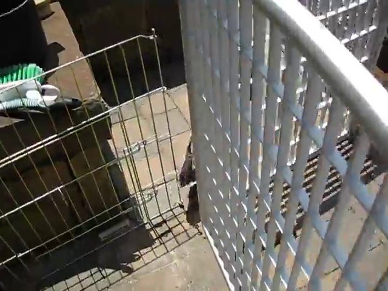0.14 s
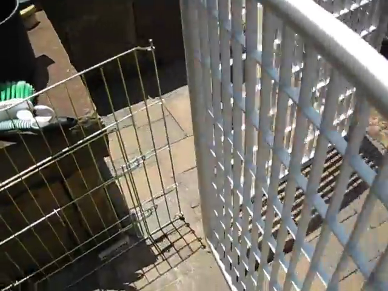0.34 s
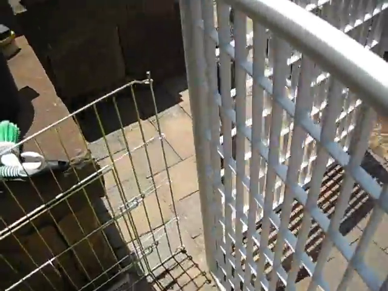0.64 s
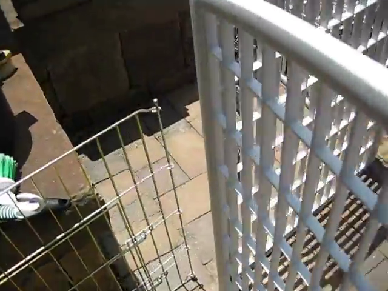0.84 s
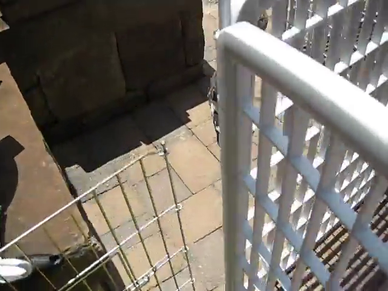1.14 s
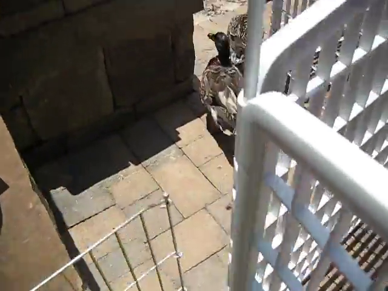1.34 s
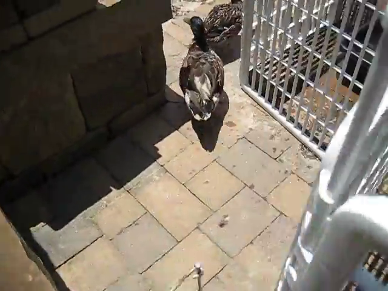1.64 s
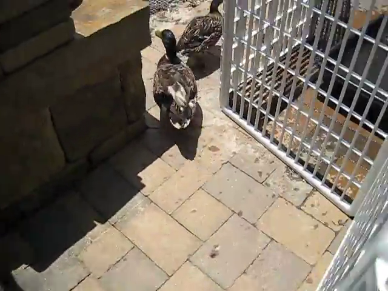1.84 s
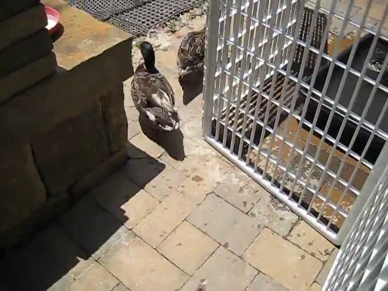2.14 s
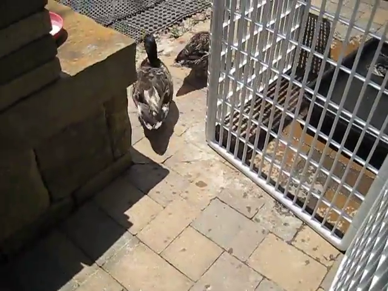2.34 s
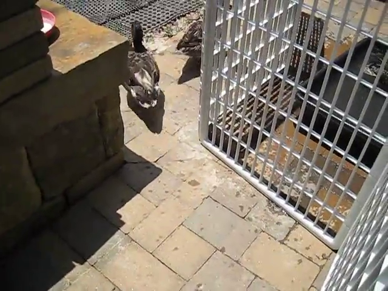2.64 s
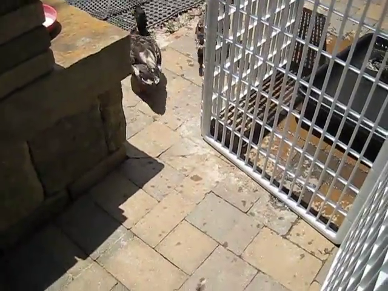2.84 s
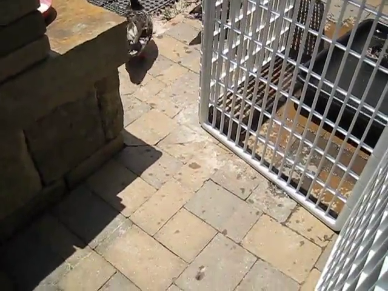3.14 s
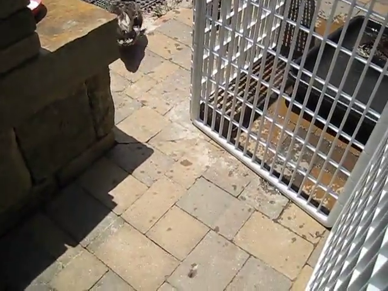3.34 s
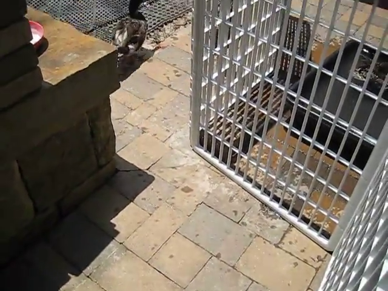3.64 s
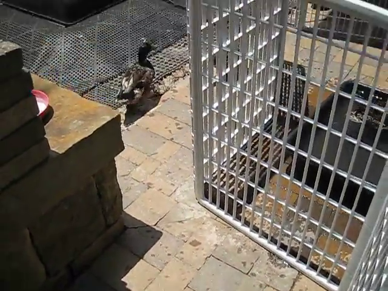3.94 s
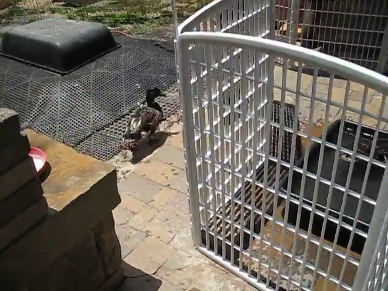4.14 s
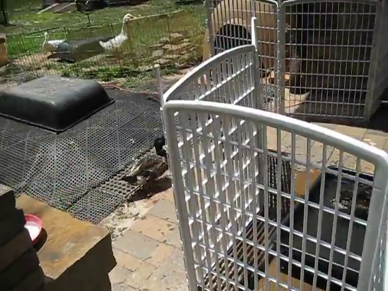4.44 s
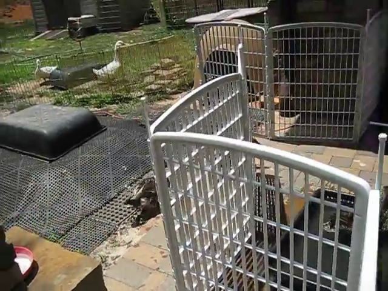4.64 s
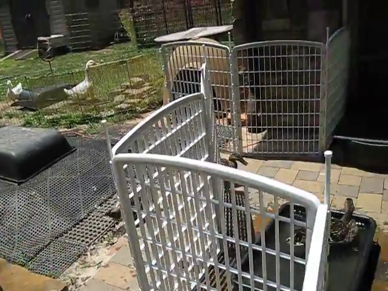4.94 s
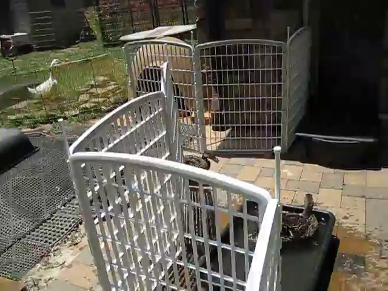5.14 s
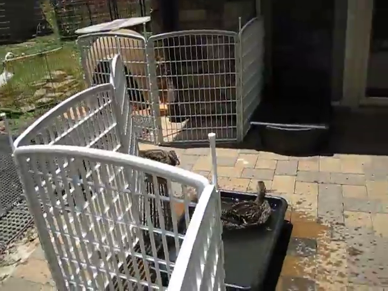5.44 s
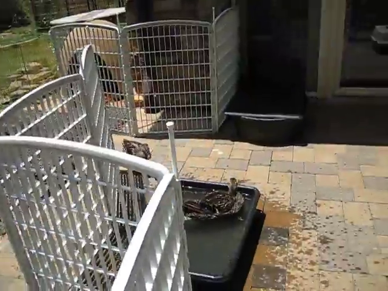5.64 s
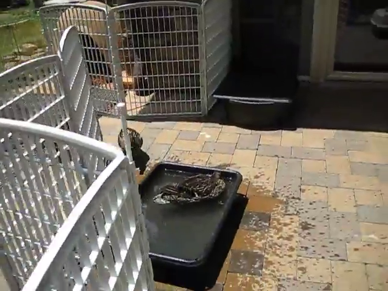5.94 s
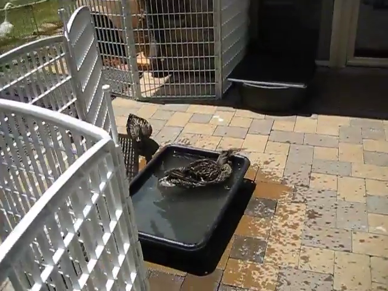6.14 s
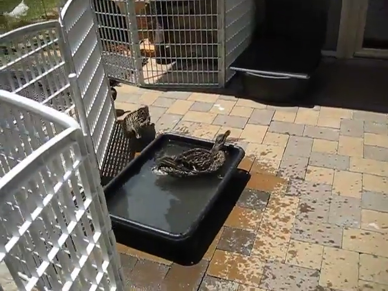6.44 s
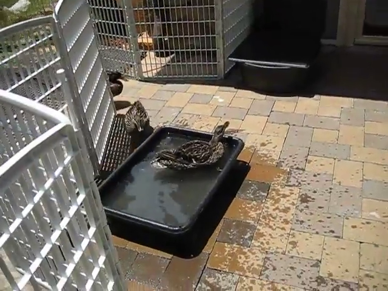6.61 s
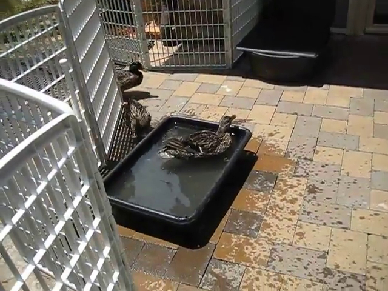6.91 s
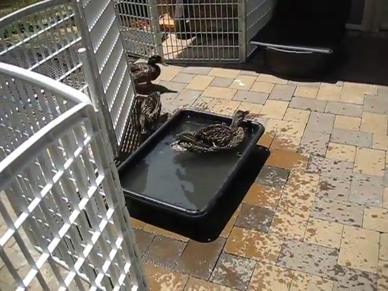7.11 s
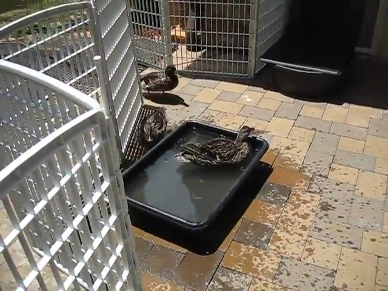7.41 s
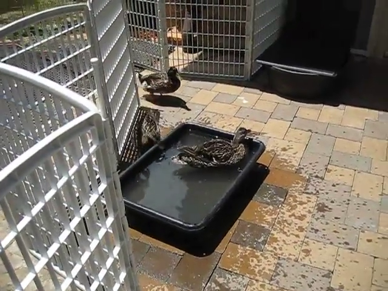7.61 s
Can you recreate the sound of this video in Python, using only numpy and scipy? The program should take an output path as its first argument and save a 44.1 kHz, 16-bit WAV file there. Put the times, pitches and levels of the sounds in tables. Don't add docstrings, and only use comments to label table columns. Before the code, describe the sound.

Ducks chatter on a sunny paved patio: first a near drake's grainy, buzzing rasps, then hens' louder, faster quacks overlapping. Thin wires shiver and ring as the gate is shaken, with small ticks and one hard clip rattle after the busiest calling. The flock quiets to closed-bill mutters and faint hisses before a few last quacks and a foot drag. Short wall echoes, soft water, airy hiss and low traffic surround them.

```python
import sys
import numpy as np
from scipy import signal
from scipy.fft import rfft, irfft, next_fast_len
from scipy.io import wavfile
from scipy.ndimage import uniform_filter1d, map_coordinates

SR = 44100
rng = np.random.default_rng(int(sys.argv[2]) if len(sys.argv) > 2 else 0)


def persist_wave(psi):
    counts = np.round(np.clip(psi, -1, 1) * 32767).astype(np.int16)
    wavfile.write(sys.argv[1], SR, np.atleast_2d(counts).T)


def makeup_ratio(level_db):
    decades = np.asarray(level_db, float) / 20
    return 10 ** decades


N = 342657


def unit(x):
    return x / np.sqrt(np.mean(x ** 2) + 1e-20)


def along(points, hz):
    f, v = np.transpose(points)
    return np.interp(np.log(hz + 1), np.log(f + 1), v)


def filtered(x, response):
    m = next_fast_len(len(x) + 8192)
    return irfft(rfft(x, m) * response(np.fft.rfftfreq(m, 1 / SR)), m)[:len(x)]


def add_at(out, s, sound):
    out[round(s * SR):][:len(sound)] += sound


def rush(spectrum, patchy_db):
    z = signal.stft(rng.standard_normal(N), nperseg=512)[2]
    patches = uniform_filter1d(rng.standard_normal(z.shape), size=6, axis=0)
    patches = uniform_filter1d(patches, size=12, axis=1)
    noise = signal.istft(z * makeup_ratio(patchy_db * unit(patches)), nperseg=512)[1][:N]
    points = [(8, -120)] + list(spectrum) + [(21000, -120)]
    return unit(filtered(noise, lambda hz: makeup_ratio(along(points, hz))))


def resonances(modes, f, order=1):
    total = 0
    for k, (c, w, db) in enumerate(modes):
        ring = 1j * f * w / (c * c - f * f + 1j * f * w)
        total = total + (-1) ** k * makeup_ratio(db) * ring ** order
    return total


def strokes(rows, db_per_s, fade_s):
    t = np.arange(N) / SR
    gain = np.zeros(N)
    for s, length, db in rows:
        slope_db = db_per_s * np.clip(t - s - length / 2, -length, length)
        fade = np.clip(np.minimum(t - s, s + length - t) / fade_s, 0, 1)
        gain += makeup_ratio(db + slope_db) * fade
    return gain


def duck(calls, pipe, jitter, scatter_db, puff, puff_s, arch, tint_db, rise, stretch, follows=(1, 2)):
    out, t = np.zeros(N + SR), np.arange(8192) / SR
    f = np.fft.rfftfreq(len(t), 1 / SR)
    puff_shape = rfft((t / puff_s * np.exp(1 - t / puff_s)) ** 2)
    for s, db, length, *colour_db, pulse_hz in calls:
        timing, loudness, pose, angle, detune = rng.standard_normal((5, 40))
        air = rng.standard_normal(len(t))
        times = np.cumsum((1 + jitter * timing) / pulse_hz) - .7 / pulse_hz
        places = np.clip(times * SR, 0, len(t) - 1).astype(int)

        def effort(when):
            return np.sin(np.pi * np.clip(when / (stretch * length), 0, 1) ** rise) ** 0.811

        def train(size):
            return np.bincount(places, size, len(t))

        size = effort(times) * makeup_ratio(scatter_db * loudness)
        breath = puff * irfft(rfft(train(size)) * puff_shape) * air / np.sqrt(puff_s * SR)
        neck = 1 + .01 * pose[0]
        turn = iter(1.5 * angle)
        shift = iter(1 + .01 * detune)
        parts = []
        for group in pipe:
            rung = 0
            for k, (hz, width, level) in enumerate(group):
                slaps = train(size * makeup_ratio(tint_db * rng.standard_normal(40)))
                mode = (hz * next(shift), width, level + next(turn))
                rung = rung + (-1) ** k * rfft(slaps + breath) * resonances([mode], f * neck, order=2)
            parts.append(unit(irfft(rung)))
        opening = .4 + .7 * effort(t - .006)
        opening = opening * makeup_ratio(np.interp(t, .011 * np.arange(39), pose[1:]))
        voice = parts[0]
        for g, part, k in zip(colour_db, parts[1:], follows):
            voice = voice + makeup_ratio(g) * part * opening ** k
        waver = .015 * np.interp(t, .014 * np.arange(40), angle[::-1])
        pace = 1 + arch * (effort(t) - .7) + waver
        voice = map_coordinates(voice, [np.cumsum(pace)])
        add_at(out, s, makeup_ratio(db) * np.sqrt(length * SR / len(t)) * voice)
    return out[:N]


# (time [s], level [dB], length [s], upper throat [dB])
DRAKE = [(0.001, -41.5, 0.013, -5.5), (0.118, -28.5, 0.071, -4.5), (0.245, -42.5, 0.025, -7),
         (0.338, -27, 0.058, 0), (0.459, -45, 0.046, -4), (0.681, -40, 0.1, -15),
         (0.729, -29.5, 0.054, 3.5), (0.928, -25.5, 0.063, 3), (1.24, -28, 0.056, 0),
         (1.44, -26.5, 0.069, 5), (1.761, -31.5, 0.061, 5.5), (1.962, -26.5, 0.063, 3),
         (2.271, -26, 0.06, 1), (2.472, -28.5, 0.0695, 2.5), (2.816, -32.5, 0.061, 4.5),
         (3.018, -31, 0.071, 2.5), (3.36, -35, 0.085, -3), (3.576, -30, 0.069, -2.5),
         (3.921, -32, 0.0655, -3), (4.134, -29, 0.071, -3.5), (4.524, -28.5, 0.064, -8),
         (4.758, -28.5, 0.064, -8), (5.004, -32.5, 0.026, -9), (5.722, -39.5, 0.067, -9),
         (7.013, -48, 0.036, -10), (7.217, -33, 0.035, -19), (7.323, -45.5, 0.048, -14)]
# (frequency [Hz], width [Hz], level [dB])
DRAKE_PIPE = [
    [(1805, 180, 14.5), (1200, 200, -6), (1520, 350, 0)],
    [(2235, 200, 21), (2030, 250, 13)],
    [(2790, 150, 11), (3500, 500, -8), (4620, 260, -3), (5450, 250, -6), (5900, 1700, -6)],
]
# (time [s], bill towards the camera [dB], pulse rate [Hz])
DRAKE_WALK = [
    (.2, -7.5, 75.4),
    (0.701, 0.5, 77.76),
    (1.25, -1, 82.6),
    (1.448, -6, 82.5),
    (2.798, -5, 87.5),
    (3.1, 2, 83.4),
    (3.503, -1, 76.54),
    (5.003, -3.5, 80.17),
    (5.7, -20, 83),
]


def near_drake():
    when, bill_db, pulse_hz = np.transpose(DRAKE_WALK)
    calls = []
    for call in DRAKE:
        calls.append((*call, np.interp(call[0], when, bill_db), np.interp(call[0], when, pulse_hz)))
    return duck(calls, DRAKE_PIPE, jitter=.03, scatter_db=1, puff=1.3, puff_s=.0034, arch=.08, tint_db=2.5,
                rise=0.905, stretch=1.287)


def chested(calls, chest_db):
    return [(s, db, length, chest_db, bill_db, hz) for s, db, length, bill_db, hz in calls]


HOARSE = dict(jitter=.03, scatter_db=1.8, puff=.3, puff_s=.0018, arch=.09, tint_db=3.2)
CHESTY = (-1, 2)

# (time [s], level [dB], length [s], bill [dB], pulse rate [Hz])
HEN = [
    (2.05, -25.5, 0.079, -7.5, 179.4),
    (2.582, -26.5, 0.073, -8.5, 169.7),
    (2.96, -26, 0.0746, -1, 181.7),
    (3.391, -24.5, 0.059, -2, 178.6),
]
# (frequency [Hz], width [Hz], level [dB])
HEN_PIPE = [
    [(1042, 255, 4), (1486, 197, 3.5), (1920, 1000, -7.5)],
    [(803, 330, 6.5), (183, 410, -6)],
    [(2400, 1200, 8.5), (3450, 840, 5), (3900, 300, 17.3), (5100, 570, 3.8), (6500, 1400, 6.9)],
]


def facing_hen():
    return duck(chested(HEN, -11.5), HEN_PIPE, **HOARSE, rise=0.7, stretch=1.416, follows=CHESTY)


# (time [s], level [dB], length [s], bill [dB], pulse rate [Hz])
OPEN_HEN = [
    (3.794, -25, 0.057, -3.5, 179.9),
    (4.275, -24.5, 0.051, -6, 176.9),
    (4.604, -25.5, 0.072, -6.5, 192.8),
]
# (frequency [Hz], width [Hz], level [dB])
OPEN_PIPE = [
    [(1500, 280, 6.5), (1115, 255, 3), (1930, 340, 3)],
    [(754, 280, 7), (183, 340, -5.5)],
    [(2600, 640, 10.5), (3330, 280, 4.5), (3720, 330, 9), (5200, 1300, -1.5)],
]


def open_hen():
    return duck(chested(OPEN_HEN, -11), OPEN_PIPE, **HOARSE, rise=0.703, stretch=1.4, follows=CHESTY)


# (time [s], level [dB], length [s], bill [dB], pulse rate [Hz])
HEN_TURNED = [
    (1.759, -28.5, 0.066, -9, 165.5),
    (5.167, -25, 0.062, -10.5, 174.7),
    (5.526, -23, 0.053, -10.5, 178.7),
    (7.095, -26.5, 0.054, -15, 160.5),
    (7.431, -26, 0.053, -16.5, 171),
]
# (frequency [Hz], width [Hz], level [dB])
TURNED_PIPE = [
    [(1160, 305, 11), (1480, 310, -5), (1800, 180, 5.5)],
    [(780, 370, 2.5), (184, 210, -8.5)],
    [(2480, 470, 10.5), (3310, 370, 3), (3770, 310, 5.5), (5040, 950, -1)],
]


def turned_hen():
    return duck(chested(HEN_TURNED, -12), TURNED_PIPE, **HOARSE, rise=0.74, stretch=1.29, follows=CHESTY)


# (time [s], level [dB], length [s], bill [dB], pulse rate [Hz])
LOW_HEN = [
    (.536, -30, 0.05, -5, 145.7),
    (2.135, -28.5, 0.038, -3.5, 137),
    (2.29, -31, 0.041, 2, 145.7),
    (2.415, -29, 0.039, -2.5, 147.3),
    (5.003, -33, 0.05, -6.5, 150.1),
    (5.09, -37.5, 0.028, -9, 151.5),
    (5.135, -35, 0.027, -5, 148.2),
]
# (frequency [Hz], width [Hz], level [dB])
LOW_PIPE = [
    [(1134, 300, -8), (1635, 260, 1), (2332, 84, 0)],
    [(932, 260, 7), (400, 290, -7.5)],
    [(2580, 800, 15.5), (3480, 190, 0), (4640, 720, 5.5), (5670, 600, 1)],
]


def low_hen():
    return duck(chested(LOW_HEN, -3.5), LOW_PIPE, jitter=.025, scatter_db=1.2, puff=.2, puff_s=.0015, arch=.05,
                tint_db=1.5, rise=0.864, stretch=1.47)


# (time [s], level [dB], length [s], chest [dB], bill [dB])
HEN_SOFT = [(1.149, -43.5, 0.17, -13.5, -3), (3.236, -34.5, 0.048, -6.5, -13),
            (4.372, -38.5, 0.062, -6, -17), (5.114, -43.5, 0.057, 2.5, -2), (5.764, -38, 0.043, -4, -6),
            (5.928, -48, 0.038, 2, -11), (5.991, -42.5, 0.08, -4, -18), (6.211, -42, 0.071, -21, -5.5),
            (6.407, -45, 0.086, -17, -2.5), (6.46, -41.5, 0.065, -2, -8), (6.604, -43, 0.069, 0.5, -16),
            (6.794, -47, 0.036, -8, -12)]
# (frequency [Hz], width [Hz], level [dB])
SOFT_PIPE = [
    [(1250, 250, 3), (1570, 180, 5.5), (2100, 300, 3.5)],
    [(790, 160, 0)],
    [(2590, 200, 9.5), (4500, 300, 7.5), (5100, 1300, 5)],
]


def muttering_hen():
    calls = [(*call, 173) for call in HEN_SOFT]
    return duck(calls, SOFT_PIPE, jitter=.06, scatter_db=2.5, puff=.8, puff_s=.003, arch=.1, tint_db=3,
                rise=1.0, stretch=1.214)


# (time [s], level [dB], length [s], upper throat [dB])
FAR_DRAKE = [(1.643, -43, 0.05, -11), (1.932, -37.5, 0.044, 1), (2.33, -24, 0.008, -12),
             (2.761, -35, 0.064, -7), (3.469, -31.5, 0.048, -3), (3.689, -30.5, 0.044, -6),
             (3.888, -33.5, 0.04, -1.5), (4.673, -39, 0.016, -17), (4.822, -41, 0.053, 1.5),
             (5.28, -37.5, 0.056, -7), (5.56, -43, 0.045, -5)]
# (frequency [Hz], width [Hz], level [dB])
FAR_PIPE = [
    [(1570, 220, 0)],
    [(2150, 710, 0.5), (1200, 600, -4), (1820, 60, -28)],
]


def far_drake():
    calls = [(*call, 68) for call in FAR_DRAKE]
    return duck(calls, FAR_PIPE, jitter=.1, scatter_db=2, puff=3, puff_s=.005, arch=.06, tint_db=2,
                rise=0.83, stretch=1.505)


# (time [s], length [s], level halfway [dB])
WHEEZE = [
    (1.59, 0.3, -58.5),
    (5.28, 0.38, -61),
    (7.14, 0.5, -61.5),
]
# (frequency [Hz], width [Hz], level [dB])
WHEEZE_PIPE = [(1190, 430, -1), (1900, 110, -2), (2340, 240, 0.5), (3160, 40, 1), (3470, 98, 0.5),
               (4130, 160, 0.5), (4860, 180, 0), (5300, 270, -3.5)]


def wheeze():
    hiss = unit(filtered(rng.standard_normal(N), lambda f: resonances(WHEEZE_PIPE, f)))
    return makeup_ratio(17.5) * strokes(WHEEZE, db_per_s=-19, fade_s=0.049) * hiss


# (time [s], length [s], level halfway [dB])
SCUFF = [
    (7.39, 0.045, -48),
    (7.58, 0.11, -42.5),
    (7.7, 0.082, -45.5),
]
# (frequency [Hz], level per Hz [dB])
SCUFF_TONE = [(7000, -5.5), (9500, -4), (13000, -7), (16000, -16)]


def scuff():
    return strokes(SCUFF, db_per_s=90, fade_s=0.0067) * rush(SCUFF_TONE, patchy_db=5.5)


# (time [s], peak level
# [dB], time to fall 60 dB [s])
GATE_SHAKES = [(2.077, -26.5, 0.11), (2.112, -24.5, 0.16), (2.156, -22.5, 0.17), (2.2844, -24, 0.17),
               (2.2956, -19, 0.16), (2.3696, -17.5, 0.38), (2.4294, -22, 0.16), (2.4623, -20, 0.13),
               (2.5094, -18, 0.073), (2.591, -12, 0.18), (2.6194, -21, 0.29), (2.6794, -27, 0.18),
               (2.7546, -28, 0.16), (2.8525, -29, 0.15), (2.902, -25, 0.32), (2.9394, -29.5, 0.54),
               (2.9791, -26.5, 0.36), (3.019, -27, 0.25), (3.0494, -23, 0.11), (3.268, -22.5, 0.22),
               (3.3094, -33, 0.1),
               (0.0518, -35, 0.17), (0.1979, -39, 0.24), (0.5571, -36, 0.29), (1.0894, -37, 0.12),
         (1.5085, -42, 0.59), (1.7509, -34, 0.091), (1.8701, -38.5, 0.21), (3.21, -42, 0.31),
         (3.4256, -33, 0.054), (3.466, -40, 0.67), (3.6671, -42, 0.15), (3.7594, -37, 0.083),
         (3.8442, -40, 0.24), (4.0402, -38, 0.14), (4.0617, -29.5, 0.091), (4.143, -36, 0.13),
         (4.393, -32.5, 0.33), (4.9023, -37, 0.06), (5.0305, -41, 0.44), (5.2759, -40, 0.067),
         (5.6346, -27.5, 0.18), (5.918, -33, 0.09), (6.7294, -47, 0.31), (7.4684, -46, 0.1)]
# (frequency [Hz], width [Hz], level [dB])
WIRE = [(8990, 40, -4), (9130, 40, 0), (9265, 40, -1), (10240, 60, -2), (11070, 50, -5), (12080, 40, -7)]
# (frequency [Hz], level per Hz [dB])
SHAKE = [(4500, -14.5), (7000, 3.5), (8500, 10), (10000, 1), (13000, -6.5), (16000, -9.5)]
# (frequency [Hz], level per Hz [dB])
LOW_WIRES = [(2000, -44), (4000, 6), (6000, 4.5), (8000, 11), (9500, -33)]


def gate_buzz():
    top, low = np.zeros((2, N + SR))
    t = np.arange(SR // 2) / SR
    for s, db, t60 in GATE_SHAKES:
        shake = makeup_ratio(db + 2.0 - 60 * t / max(t60, .02)) * (1 - np.exp(-t / 0.0036))
        low_db = min(-29.5 + 0.52 * (db + 18), -35)
        add_at(top, s, shake ** 2)
        add_at(low, s, (shake * makeup_ratio(low_db - db)) ** 2)
    grains = makeup_ratio(0.6 * unit(uniform_filter1d(rng.standard_normal(N), size=90)))
    ring = unit(filtered(rng.standard_normal(N), lambda f: resonances(WIRE, f)))
    buzz = np.sqrt(top[:N]) * unit(grains * (rush(SHAKE, patchy_db=3) + .3 * ring))
    return buzz + np.sqrt(low[:N]) * rush(LOW_WIRES, patchy_db=3)


# (time [s], peak level [dB], ring frequency [Hz], width [Hz])
TICKS = [(0.73, -28.5, 1000, 490), (2.2722, -21, 2500, 3000), (4.666, -38, 3890, 25),
         (5.595, -40, 3800, 30), (5.9447, -27.5, 1500, 900), (5.95, -30, 2230, 900),
         (5.9594, -27, 5300, 1500), (6.127, -29, 4160, 1200), (6.127, -28, 11000, 5000),
         (6.4984, -29, 11000, 7000), (7.2129, -30, 13500, 5000), (7.2702, -14.5, 9900, 5000),
         (7.2704, -20, 4500, 2000)]


def gate_ticks():
    out, t = np.zeros(N + SR), np.arange(4000) / SR
    for s, db, hz, width_hz in TICKS:
        click = t * np.exp(-np.pi * width_hz * t) * np.sin(2 * np.pi * hz * t)
        add_at(out, s, makeup_ratio(db) * click / np.max(np.abs(click)))
    return out[:N]


# (time [s], peak level [dB])
RATTLE = [
    (.089, -27),
    (4.528, -32),
    (5.638, -7),
    (5.6445, -23),
    (5.6497, -31),
    (5.659, -33),
    (5.6695, -32),
    (5.676, -31),
    (5.921, -23),
    (6.157, -34),
]
CLIP_RING = [(4600, 2500, -2), (9500, 4000, 3)]


def clip_rattle():
    out, t = np.zeros(N + SR), np.arange(600) / SR
    for s, db in RATTLE:
        burst = unit(filtered(rng.standard_normal(600), lambda f: resonances(CLIP_RING, f)))
        add_at(out, s, makeup_ratio(db - 60 * t / 0.0054) * burst / 2)
    return out[:N]


# (frequency [Hz], level [dB], time to fall 60 dB [s])
CLINK = [(9098, -9, 0.17), (10100, 8, 0.24), (11670, -21, 0.63), (12730, -15, 0.26), (14130, -13, 0.18),
         (15640, -11, 0.31)]


def wire_clink():
    out, t = np.zeros(N + SR), np.arange(SR // 2) / SR
    for hz, db, t60 in CLINK:
        add_at(out, 3.268, makeup_ratio(-36 + db - 60 * t / t60) * np.sin(2 * np.pi * hz * t))
    return out[:N]


# (time [s], level [dB])
YARD = [(0, -56.5), (.3, -59.5), (1.4, -62), (2.1, -55), (2.4, -58), (3.1, -56.5), (4.9, -58),
        (5.02, -66.5), (5.15, -59.5), (5.7, -58), (5.95, -62.5), (6.9, -63.5), (7.4, -60.5), (7.77, -61)]


def stir_db():
    return np.interp(np.arange(N) / SR, *np.transpose(YARD))


# (frequency [Hz], level per Hz [dB])
WATER = [(240, -10.5), (400, -11), (703, -8.5), (758, -6.5), (1040, -5), (1250, -3.5), (1450, -4.5),
         (1990, -5), (8000, -10), (10400, -59), (17600, -120)]


def water():
    return makeup_ratio(stir_db() + 16) * rush(WATER, patchy_db=.8)


# (frequency [Hz], level per Hz [dB])
HISS = [(6000, -4.5), (8000, 7), (10000, -2.5), (13000, -12.5), (16000, -16)]


def air_hiss():
    t, stir = np.arange(N) / SR, stir_db()
    hiss = makeup_ratio(-40.5 - 1.19 * t + 0.21 * (stir - stir.mean()))
    shiver = makeup_ratio(-25.5) * np.exp(-((t - 2.477) / 0.15) ** 2)
    return (hiss + shiver) * rush(HISS, patchy_db=.8)


# (frequency [Hz], level per Hz [dB])
RUMBLE = [(12, -39), (20, -9), (86, -4.5), (323, -6.5), (387, -9), (702, -9.5), (1500, -27), (1950, -54),
          (3300, -120)]


def traffic():
    return makeup_ratio(-48.0) * rush(RUMBLE, patchy_db=.8)


# (frequency [Hz], time to fall 60 dB [s])
WALLS = [(300, 0.33), (2000, 0.12), (8000, 0.095)]


def walls(x):
    hz, t, z = signal.stft(rng.standard_normal(SR // 2), SR, nperseg=256)
    tail = signal.istft(z * makeup_ratio(-60 * t / along(WALLS, hz)[:, None]), SR, nperseg=256)[1]
    return signal.fftconvolve(np.pad(x, (200, 0)), tail / np.linalg.norm(tail))[:N]


def scene():
    near = near_drake() + facing_hen() + open_hen() + turned_hen() + low_hen()
    far = muttering_hen() + far_drake()
    echo = makeup_ratio(-10.5) * walls(near) + makeup_ratio(-8) * walls(far)
    gate = gate_buzz() + gate_ticks() + clip_rattle() + wire_clink()
    yard = water() + air_hiss() + traffic()
    return (near + far + echo + wheeze() + scuff() + gate + yard)[None]


def top_cut(x):
    return signal.sosfilt(signal.butter(12, 16670, fs=SR, output="sos"), x)


def record(dry):
    notch_hz, top_hz, clip_top = 7916, 15880, .5

    def ports(hz):
        return np.cos(np.pi / 2 * np.minimum(hz / notch_hz, 1.6)) * (hz < top_hz)

    squashed = dry[0] / (1 + (dry[0] / clip_top) ** 4) ** (1 / 4)
    mix = filtered(squashed, ports)[None]
    return top_cut(mix)


dry = scene()
out = record(dry)
persist_wave(out)
```